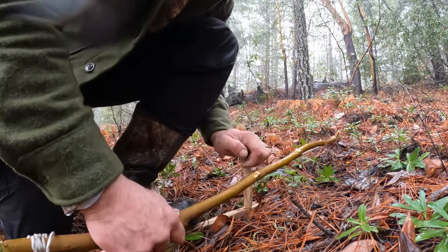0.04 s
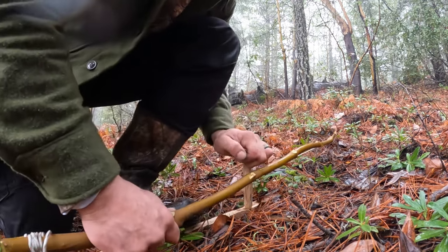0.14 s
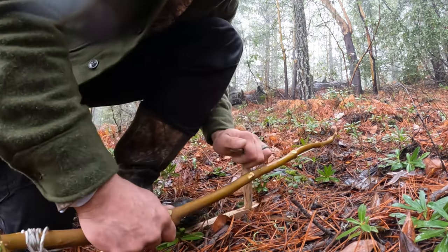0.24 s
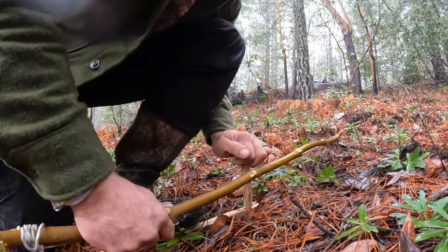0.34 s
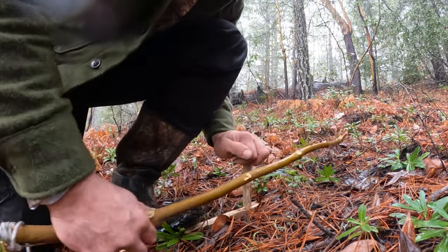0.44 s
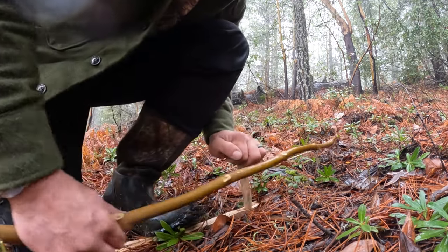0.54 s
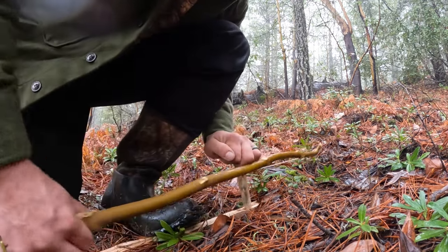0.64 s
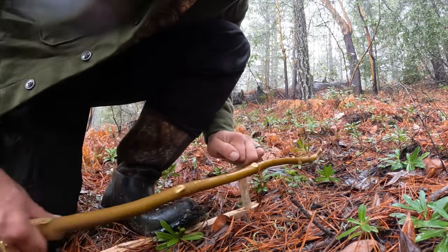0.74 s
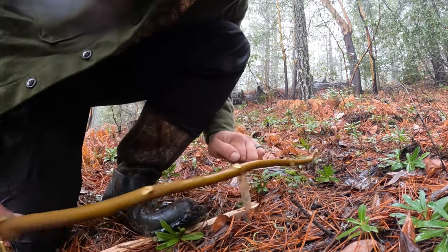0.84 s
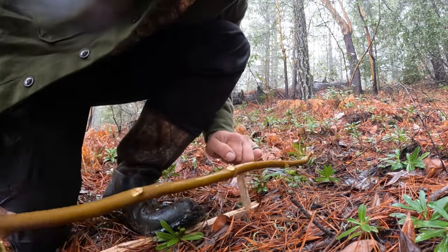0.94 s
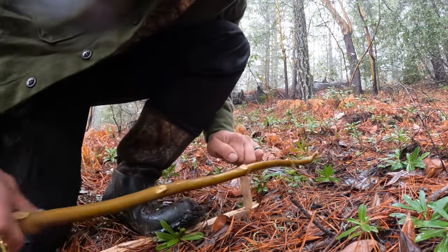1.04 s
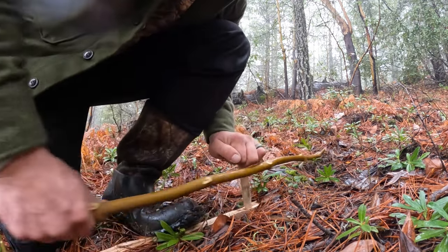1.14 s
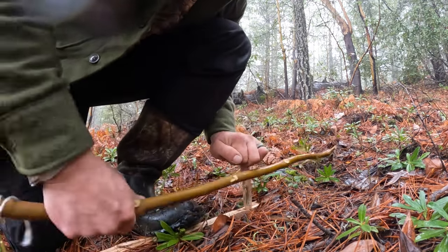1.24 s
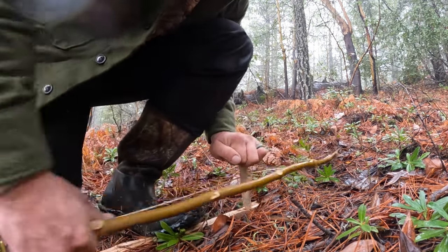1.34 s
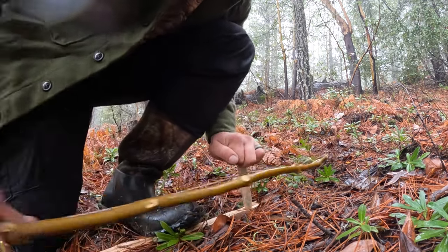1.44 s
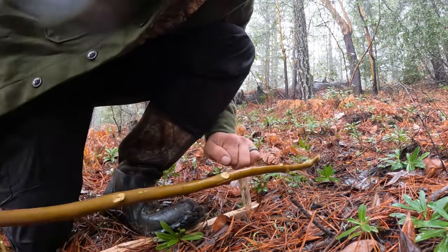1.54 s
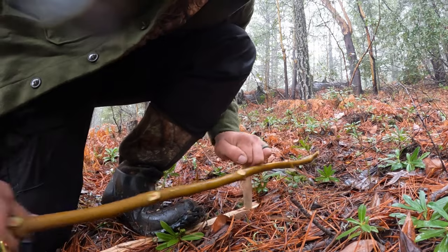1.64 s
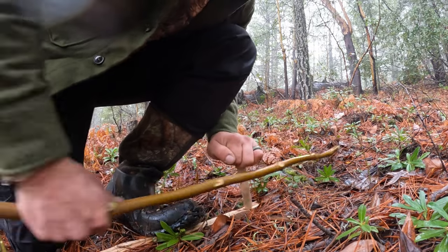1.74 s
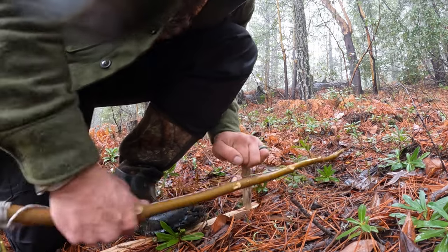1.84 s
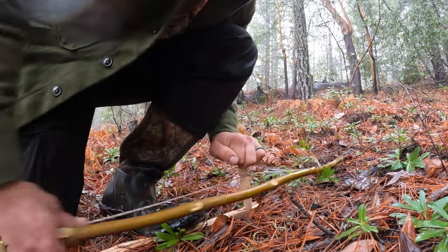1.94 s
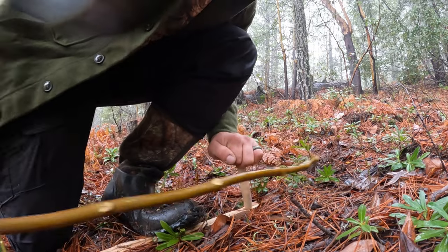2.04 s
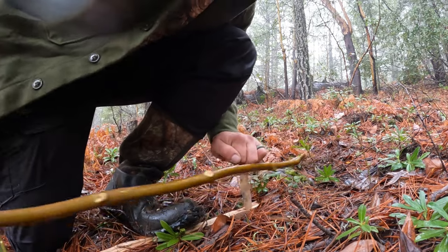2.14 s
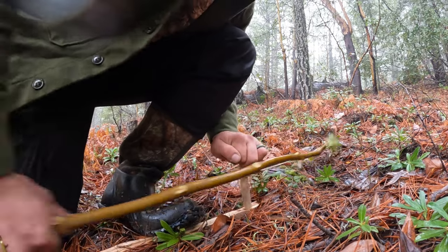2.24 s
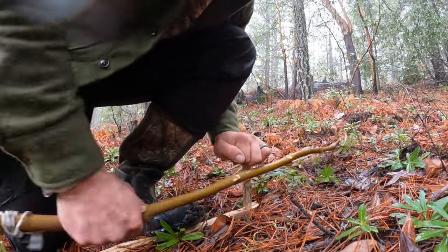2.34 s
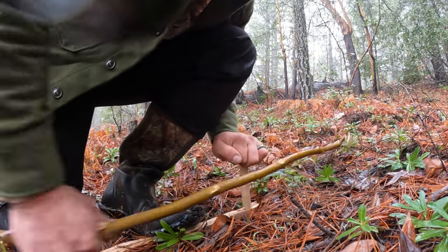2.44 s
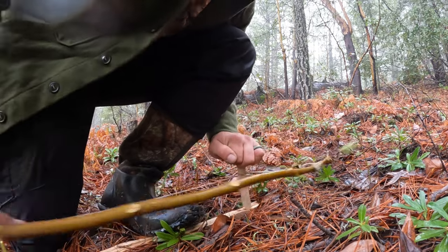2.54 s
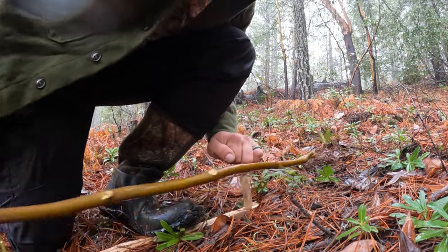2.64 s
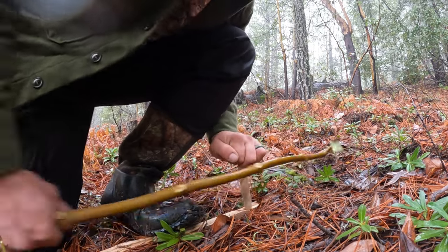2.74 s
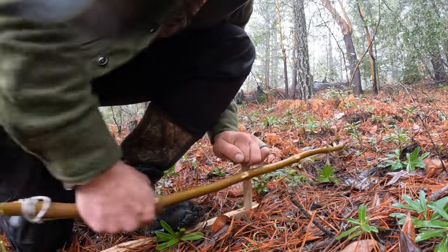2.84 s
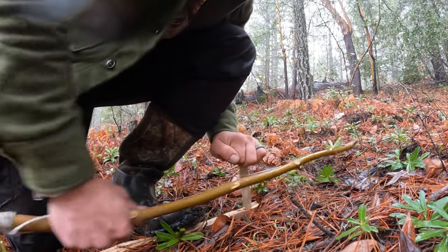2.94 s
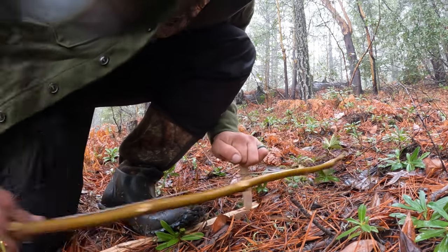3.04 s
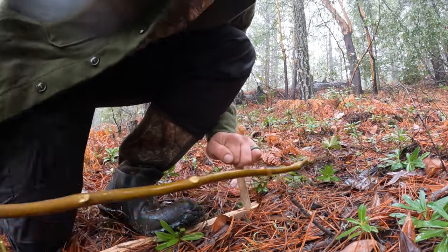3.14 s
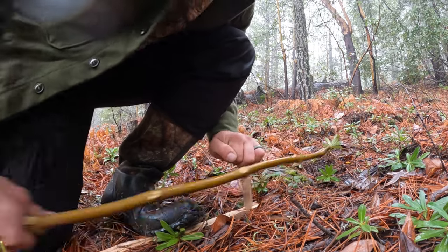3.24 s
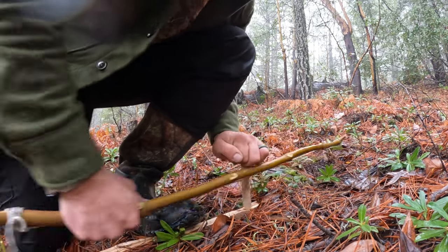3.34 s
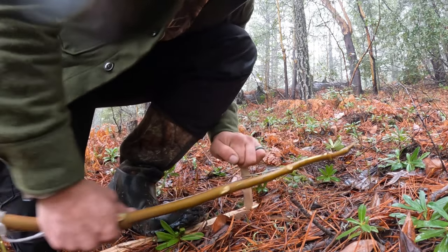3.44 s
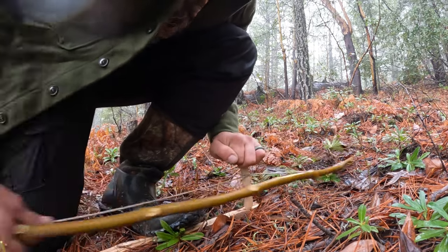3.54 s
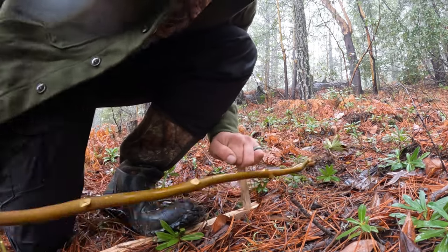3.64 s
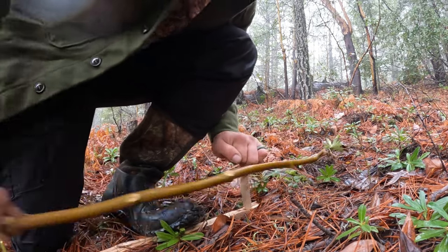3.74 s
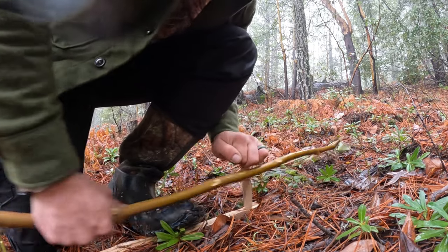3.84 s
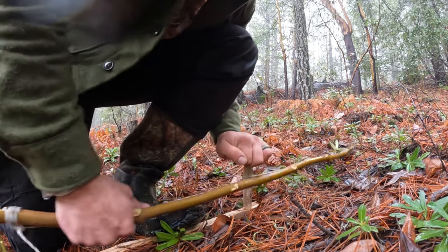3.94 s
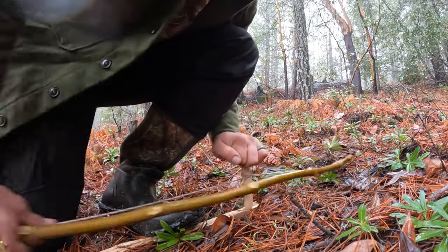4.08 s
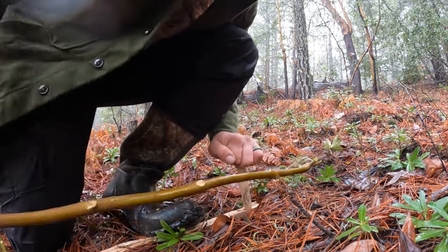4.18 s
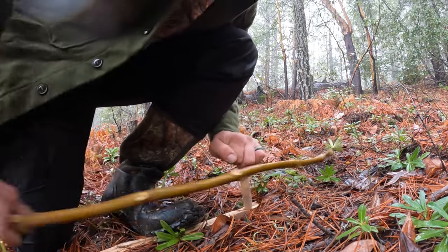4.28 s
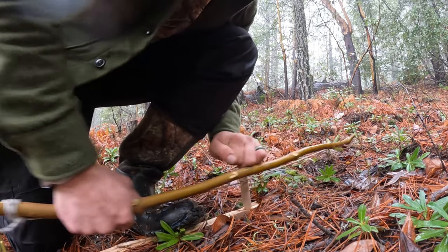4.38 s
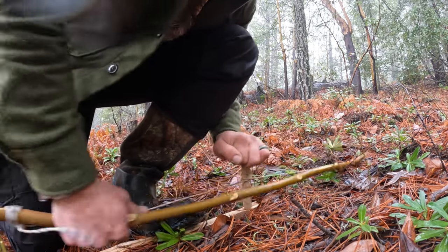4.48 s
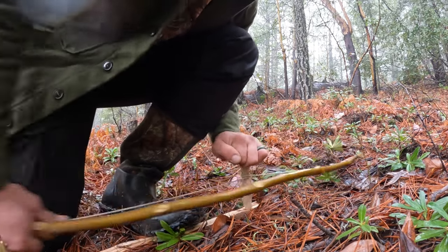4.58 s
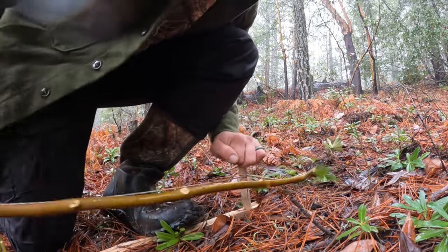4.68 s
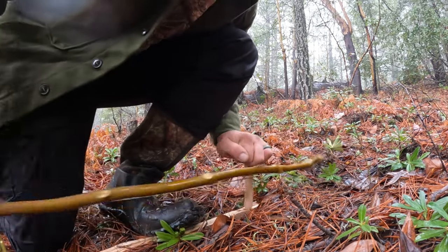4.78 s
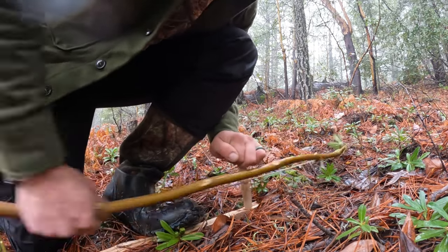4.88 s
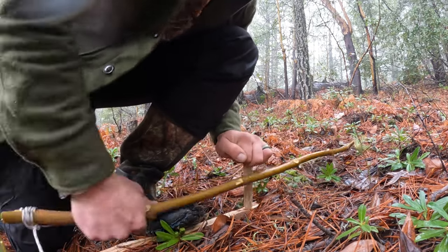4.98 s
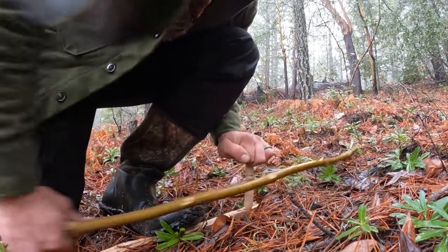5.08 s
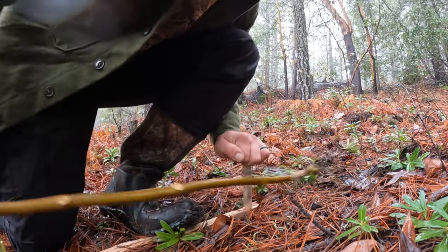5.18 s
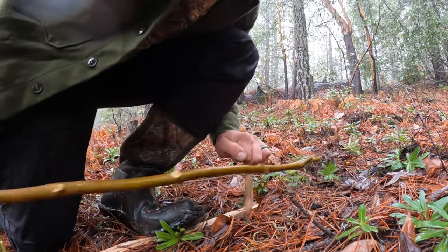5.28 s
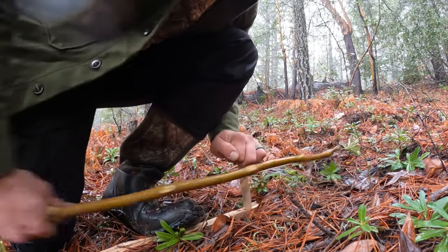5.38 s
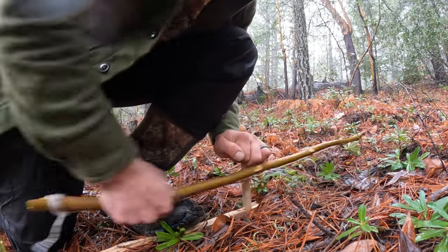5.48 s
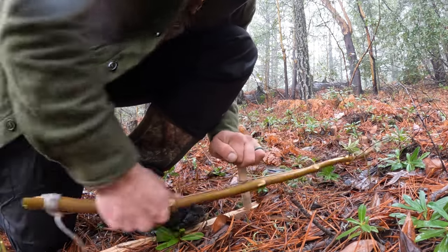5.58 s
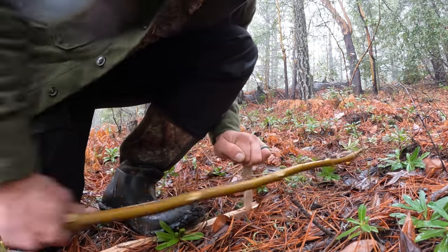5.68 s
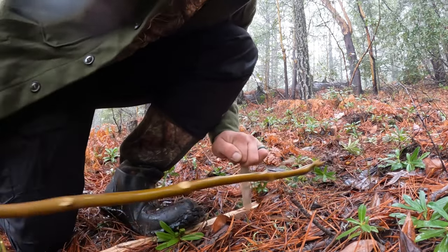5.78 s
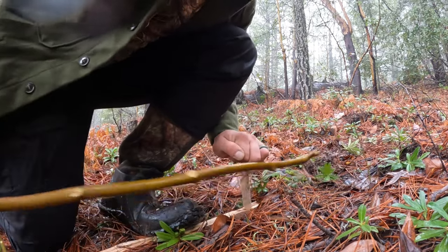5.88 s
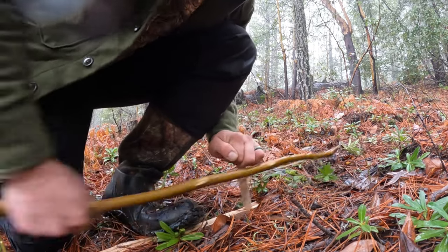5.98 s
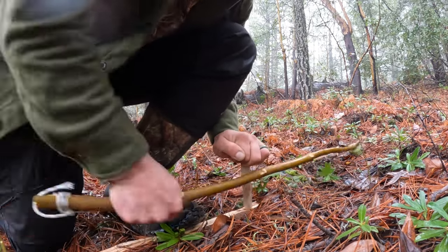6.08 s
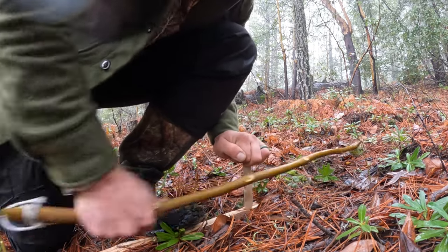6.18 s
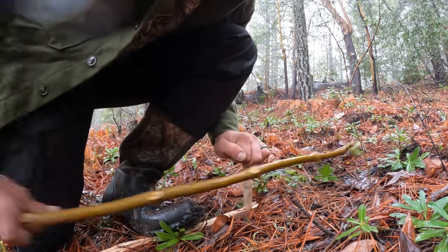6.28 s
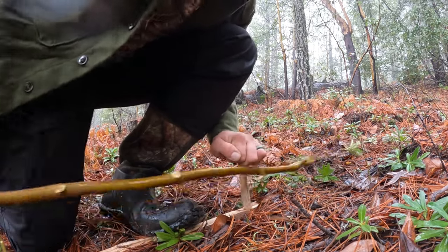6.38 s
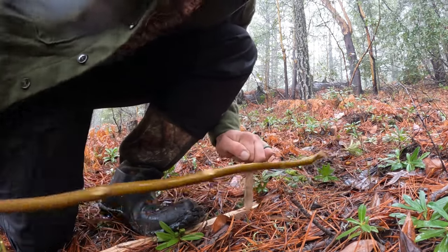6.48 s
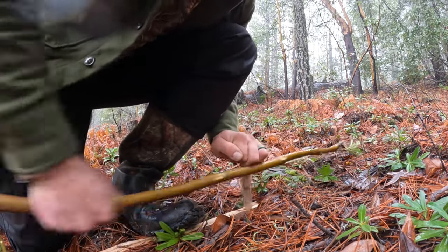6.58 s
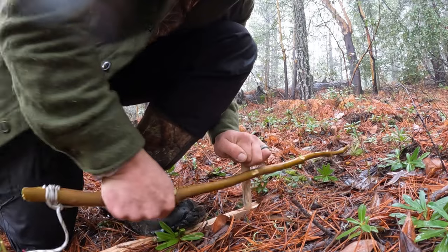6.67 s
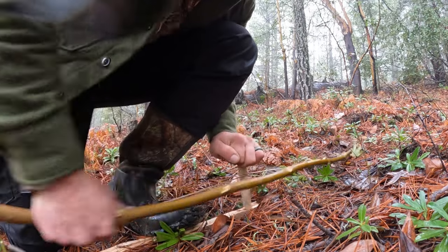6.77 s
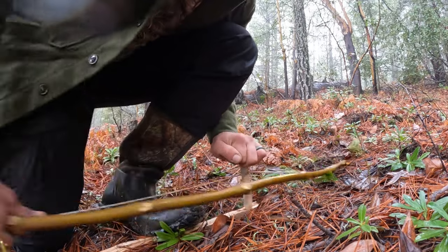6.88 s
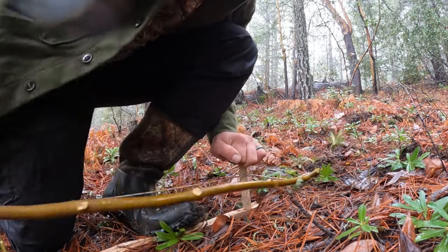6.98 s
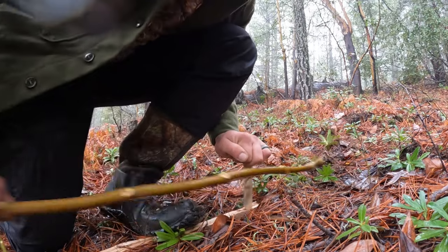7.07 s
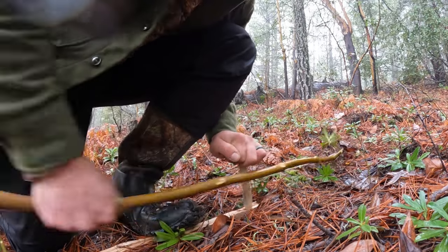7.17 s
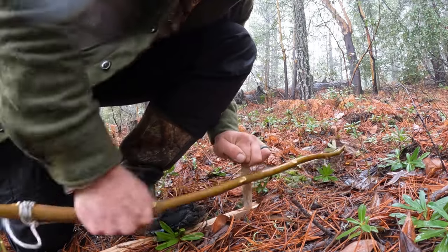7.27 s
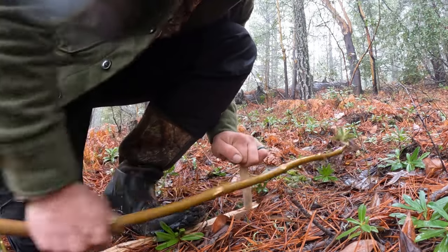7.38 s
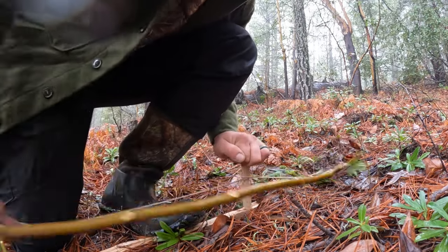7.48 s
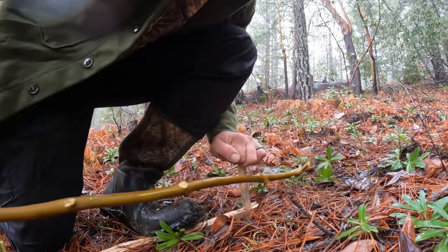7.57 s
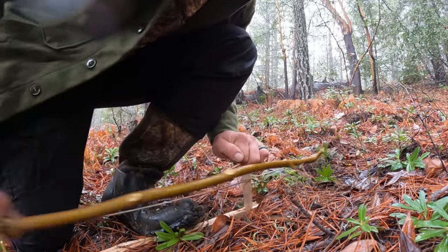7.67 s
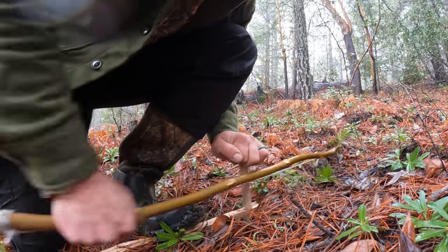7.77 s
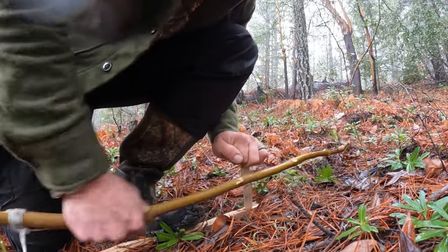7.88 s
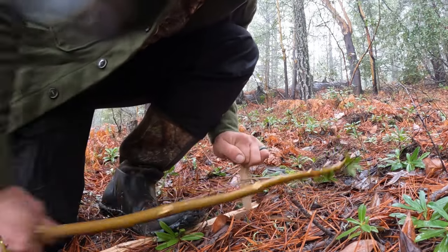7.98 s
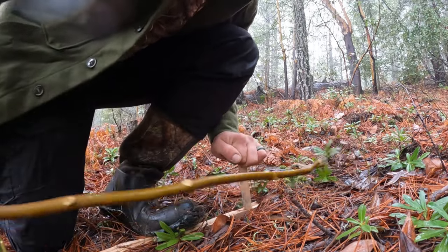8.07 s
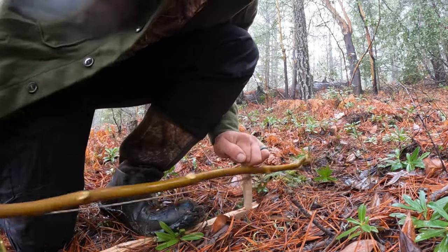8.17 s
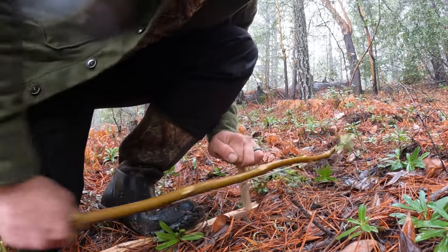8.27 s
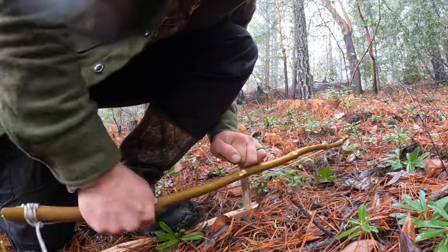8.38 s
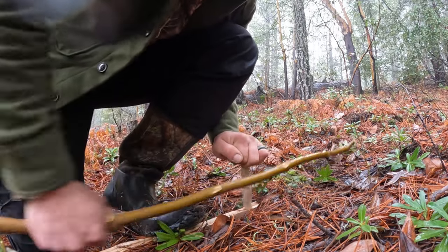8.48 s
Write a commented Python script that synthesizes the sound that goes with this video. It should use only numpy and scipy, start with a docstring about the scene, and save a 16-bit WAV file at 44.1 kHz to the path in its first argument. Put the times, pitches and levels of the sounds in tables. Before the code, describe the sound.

Very close on a quiet forest floor, a bow drill starts with a tick and a slow, throbbing scrape. After a second, quick back-and-forth rasps follow, about four strokes a second, each swelling and fading at the turn. The board chatters hollowly and the ground thrums as effort grows. Cord ticks, low knocks and a few hoarse squeaks dot the rubbing, over a faint rustle.

```python
"""On a forest floor, close to the microphone, a bow drill is worked: a slow draw, then fast strokes over it.
Tiny noisy slips make the spindle grind in the hearth board, fade at each turn and bite on the pull.
Filtered cracks and falling sines are the cord's ticks and twangs; two wavering modes are the humming stick.
Short tones squeak, the moving arm stirs low air noise, and a faint rustle lies behind it all."""
import sys
import numpy as np
from scipy import signal
from scipy.fft import rfft, irfft
from scipy.io import wavfile
from scipy.ndimage import uniform_filter1d, map_coordinates

SR = 44100
rng = np.random.default_rng(int(sys.argv[2]) if len(sys.argv) > 2 else 0)


def digitize_waveform(pressure):
    """Quantize a signal to 16-bit integers and store it at the path in sys.argv[1].

    Rows of a 2-D input are taken as channels; values are limited to [-1, 1].
    """
    field = np.atleast_2d(pressure).T
    bounded = np.clip(field, -1, 1)
    quanta = np.round(bounded * 32767).astype(np.int16)
    wavfile.write(sys.argv[1], SR, quanta)


N = 375732
T = np.arange(N) / SR
TOP_HZ = 15500  # upper limit of the fibre chirps and of the whole sound


def undb(db):
    """Decibels to gain."""
    return 10 ** (np.asarray(db) / 20)


def curve(rows):
    """Rows of (time [s], value) joined by straight lines; the end values hold."""
    return np.interp(T, *np.transpose(rows))


def over_hz(rows, hz):
    """Rows of (frequency [Hz], value) joined on a log-frequency axis."""
    points, values = np.transpose(rows)
    return np.interp(np.log(hz + 1), np.log(points), values)


def colour(x, spectrum, size=8192):
    """Causal minimum-phase filter of unit energy with the given spectrum."""
    hz = np.arange(size // 2 + 1) * SR / size
    cepstrum = irfft(np.log(undb(over_hz(spectrum, hz))))
    # folding the cepstrum forward in time makes the filter causal
    cepstrum[1:size // 2] *= 2
    cepstrum[size // 2 + 1:] = 0
    response = irfft(np.exp(rfft(cepstrum)))
    return signal.oaconvolve(x, response / np.linalg.norm(response))[:N]


def resonate(x, hz, q):
    """Let one resonance ring."""
    return signal.lfilter(*signal.iirpeak(hz, q, fs=SR), x)


def noise():
    """White noise of rms 1."""
    return rng.standard_normal(N)


def walk(rate):
    """Smooth chance of spread 1 that changes about rate times a second."""
    steps = rng.standard_normal(N // 8)
    smooth = map_coordinates(steps, [T * rate], order=3, mode="wrap")
    return smooth / smooth.std()


def add(out, start_s, sound):
    """Mix a sound into a track."""
    i = max(int(start_s * SR), 0)
    out[i:i + len(sound)] += sound[:max(N - i, 0)]


def slips(rate, spread_db):
    """Wood fibres catch and let go: dense tiny impulses of uneven size, rms 1."""
    sizes = undb(spread_db * np.minimum(rng.exponential(size=N), 6)) * rng.choice([-1, 1], N)
    impulses = sizes * (rng.random(N) < rate / SR)
    return impulses / impulses.std()


def grains(rate, half_s, spread_db, size=1024):
    """Fibres that chirp for a few milliseconds, each at its own steady pitch; rms 1."""
    count = int(rate * N / SR)
    when, pitch, phase, strength = rng.random((count, 4)).T
    gains = undb(spread_db * np.minimum(-np.log1p(-strength), 4))
    t = (np.arange(size) - size // 2) / SR
    window = np.exp(-.5 * (t / half_s) ** 2)
    out = np.zeros(N)
    for s, hz, turn, gain in zip(when * N / SR, pitch * TOP_HZ, phase, gains):
        chirp = np.sin(2 * np.pi * (hz * t + turn), dtype=np.float32)
        add(out, s, gain * window * chirp)
    return out / out.std()


def friction():
    """Dry wood on wood: mostly bare clicks, with brief chirps among them."""
    clicks = slips(rate=9000, spread_db=2.7)
    return .85 * clicks + .53 * grains(rate=2200, half_s=.003, spread_db=2.5)


# mid-stroke rub before the mix trim [dB], and its gain per dB of effort
RUB_DB, RUB_PER_EFFORT = -37.5, 0.36
# board over rub before the mix trim [dB], and its gain per dB of effort: it chatters far more under effort
BOARD_SHARE_DB, BOARD_PER_EFFORT = -6.5, 0.55
GROUND_PER_EFFORT = -0.093  # the ground follows effort less than the rub does
PULL_POINT, PUSH_POINT = 1.1, 0.76  # rub follows speed to this power: the pull peaks, the push is flatter
CORD_SLACK = .1  # share of the bow's top speed below which the cord only stretches
# strokes of the bow, pull and push in turn: (start [s], length [s], effort [dB])
BOW_STROKES = [(1.086, 0.31, -3), (1.393, 0.28, -5.5), (1.693, 0.27, -0.5), (1.967, 0.28, -2.5),
               (2.241, 0.26, 0), (2.51, 0.25, -3.0), (2.764, 0.26, 2.5), (3.022, 0.26, -1),
               (3.285, 0.24, 3.5), (3.528, 0.28, -3.5), (3.797, 0.26, 1), (4.059, 0.26, -5.5),
               (4.342, 0.221, 5.5), (4.568, 0.26, -1.5), (4.865, 0.24, 2.5), (5.119, 0.26, 0.5),
               (5.39, 0.28, 4.5), (5.672, 0.3, 1.5), (5.968, 0.279, 4), (6.258, 0.28, -2),
               (6.557, 0.27, 4.0), (6.826, 0.28, -5.5), (7.123, 0.29, 0.5), (7.409, 0.28, -3),
               (7.704, 0.24, 3), (7.964, 0.25, -4), (8.25, 0.25, 3)]
# weight on the hearth board, as ground over rub before the mix trim: (time [s], level [dB])
BOARD_WEIGHT = [(1.2, -12.5), (1.9, -5.5), (3.0, -7.5), (4.1, -6.5), (4.7, -3), (5.3, -6), (5.8, -2.5),
                (6.3, -6.5), (7.3, -6.5), (8.05, -2.5), (8.45, -7)]


def bowing():
    """The bow's motion: rub gain, board and ground shares, which strokes pull, and the spindle's speed."""
    gain, speed, effort, pull = np.zeros((4, N))
    for k, (start, length, effort_db) in enumerate(BOW_STROKES):
        now = slice(int(start * SR), int((start + length) * SR))
        pulling = k % 2 == 0
        # the spindle stands still at each end of a stroke and is fastest in the middle
        bow_speed = np.abs(np.sin(np.pi * (T[now] - start) / length))
        arc = np.maximum(bow_speed - CORD_SLACK, 0) / (1 - CORD_SLACK)
        point = PULL_POINT if pulling else PUSH_POINT
        gain[now] += undb(RUB_DB + RUB_PER_EFFORT * effort_db) * arc ** point
        speed[now] = np.maximum(speed[now], arc)
        effort[now], pull[now] = effort_db, pulling
    board_share = undb(BOARD_SHARE_DB + BOARD_PER_EFFORT * effort)
    ground_share = undb(curve(BOARD_WEIGHT) + GROUND_PER_EFFORT * effort)
    return gain, board_share, ground_share, pull, speed


# lesser bites come by chance on the pull: rate of change [Hz], strength, rarity [spreads]
BITE_HZ, BITE_STRENGTH, BITE_THRESHOLD = 55.5, 2.0, 0.86
# hardest bites of the spindle in its socket: (time [s], strength before the grip shapes it [dB])
HARD_BITES = [(1.162, 4.5), (1.232, 3), (1.299, 3.5), (3.491, 6), (3.888, 6.5), (7.232, 3.5), (7.269, 2)]


def grip(pull, speed, turns_hz=29, flutter_db=0.97):
    """Contact force: the spindle is out of round, so it presses once a turn, and now and then bites."""
    # the cord brings the spindle up to speed early in each stroke
    turns = np.cumsum(turns_hz * np.sqrt(speed) * (1 + .1 * walk(9))) / SR
    bites = sum(db * np.exp(-.5 * np.minimum(np.abs(T - s) / .008, 10) ** 2) for s, db in HARD_BITES)
    bites = bites + BITE_STRENGTH * np.maximum(walk(BITE_HZ) - BITE_THRESHOLD, 0) * pull * speed
    # the pull presses harder, so it throbs more than the push
    wobble_db = np.where(pull, 2.4, 1.5) * np.sin(2 * np.pi * turns) * speed
    # around a bite the throb weakens, and the rub is softer just before and after it
    around = uniform_filter1d(bites, int(.05 * SR))
    bite_db = 1.3 * bites - around
    return undb(wobble_db * np.exp(-np.abs(around)) + bite_db + flutter_db * walk(170))


# throb of the slow draw: rate [Hz], one moment of catching [s], full depth either way [dB]
DRAW_THROB_HZ, DRAW_CATCH_S, DRAW_THROB_DB = 6.6, 0.564, 3
# scrape of the slow draw, which runs on softly beneath the fast strokes,
# before throb and mix trim: (time [s], level [dB])
DRAW_LEVEL = [(0, -47.5), (.12, -59.5), (.33, -59.5), (.56, -47.5), (.74, -43.5), (1.0, -43), (1.04, -59.5),
              (1.2, -53)]


def slow_draw():
    """Gain of the slow draw's scrape: it throbs in slow surges and runs on softly beneath the fast strokes."""
    throb = np.cos(2 * np.pi * DRAW_THROB_HZ * (T - DRAW_CATCH_S))
    growth = np.minimum(T / DRAW_CATCH_S, 1) ** 2
    return undb(curve(DRAW_LEVEL) + DRAW_THROB_DB * throb * growth)


# softer scrape of the slow draw: (frequency [Hz], relative level per Hz [dB])
DRAW_SPECTRUM = [(90, -11), (170, 4.5), (300, -2.5), (520, -12), (900, -7), (1600, 0), (2900, -2.5),
                 (4200, 3), (5800, -6), (7400, -0.5), (10000, -14.5), (11400, -10), (15000, -33)]
# rasp of the spindle in its socket: (frequency [Hz], relative level per Hz [dB])
RUB_SPECTRUM = [(300, -19.5), (600, -10), (1400, -2.5), (2100, -3.5), (3100, 0), (4700, 0), (5900, -6),
                (6700, -3.5), (7400, 0.5), (8000, -5.5), (8800, -3.5), (10000, -17), (11400, -10),
                (12800, -16.5), (15500, -41.5)]
# ring of the hearth board, also under the knocks: (frequency [Hz], relative level per Hz [dB])
BOARD_SPECTRUM = [(200, -11), (480, -20), (620, -6), (760, 0.5), (950, -2), (1200, -11.5), (1450, -9),
                  (2000, -16), (3400, -21), (4900, -39), (6200, -25), (7300, -6), (9500, -45), (15000, -54)]
# thrum of the ground below: (frequency [Hz], relative level per Hz [dB])
GROUND_SPECTRUM = [(30, -9), (78, 1.5), (100, -2), (123, 5), (160, -2), (210, 0), (260, -6.5), (320, -4),
                   (430, -16), (600, -28), (2000, -49)]


def drill(draw_db=-3, rub_db=-3.7, board_db=-2.7, ground_db=-2.4, body_hz=1300, board_bite=1.58,
          thud_db=2.5, push_db=-2.5, thrum_db=-5.0, thrum_hz=215, thrum_q=3):
    """Slips scrape at the socket, ring the board when the spindle runs fast, and thrum in the ground."""
    gain, board_share, ground_share, pull, speed = bowing()
    force, scrape = grip(pull, speed), friction()
    draw = colour(scrape * slow_draw(), DRAW_SPECTRUM)
    rub = colour(scrape * gain * force, RUB_SPECTRUM)
    # a slow spindle only hisses: the body of the rasp comes with speed
    body = signal.lfilter(*signal.butter(1, body_hz, fs=SR), rub)
    rub = rub - (1 - speed) * body
    # the board needs both speed and pressure before it chatters
    chatter = gain * board_share * speed * force ** board_bite * undb(2.26 * walk(110))
    judder = .7 * slips(rate=4000, spread_db=2.2) + .7 * grains(rate=3000, half_s=.003, spread_db=2)
    board = colour(judder * chatter, BOARD_SPECTRUM)
    # the board rocks unevenly on the soft soil
    load = gain * ground_share * force * undb(thud_db * walk(45))
    thuds = slips(rate=450, spread_db=2.0) * load
    # the push loads it more lightly, so it thrums higher than on the pull
    thrum = resonate(thuds * (1 - pull), thrum_hz, thrum_q)
    loaded = thuds * np.where(pull, 1, undb(push_db))
    ground = colour(loaded + undb(thrum_db) * thrum, GROUND_SPECTRUM)
    return undb(draw_db) * draw + undb(rub_db) * rub + undb(board_db) * board + undb(ground_db) * ground


# hard judders that knock the hearth board: (time [s], level [dB])
BOARD_KNOCKS = [(2.875, -42), (2.921, -36.5), (3.406, -40), (3.93, -35), (5.323, -36.5), (5.553, -37.5),
                (6.099, -35.5), (6.128, -30), (6.673, -36.5), (7.817, -39), (7.851, -35.5), (8.363, -39),
                (8.399, -33.5)]


def board_knocks(half_s=0.0041, lean=0.37, size=2048):
    """A short cluster of hard slips rings the hearth board with a hollow rasp."""
    out, t = np.zeros(N), (np.arange(size) - size // 2) / SR
    # the knock rises faster than it dies
    width = half_s * (1 + .5 * lean * np.sign(t))
    window = np.exp(-.5 * (t / width) ** 2)
    ring = colour(slips(rate=2500, spread_db=2.2), BOARD_SPECTRUM)
    for s, db in BOARD_KNOCKS:
        i = int(s * SR)
        knock = ring[i:i + size] * window
        add(out, s + t[0], undb(db) * knock * np.linalg.norm(window) / np.linalg.norm(knock))
    return out


# spindle squeaks: (time [s], pitch before waver [Hz], level before roughness [dB], half length [s])
SPINDLE_SQUEAKS = [(0.43, 2400, -60, 0.077), (0.577, 2200, -46, .005), (2.625, 1560, -43, 0.013),
                   (2.895, 1496, -38.5, .005), (3.129, 1460, -35, 0.0086), (5.214, 1542, -39, 0.017)]


def squeaks(waver=0.053, rough_db=3, octave_db=-15):
    """For a moment the slips lock to one resonance of the spindle: a hoarse, short tone."""
    out, drift = np.zeros(N), 1 + waver * walk(350)
    for s, hz, db, half_s in SPINDLE_SQUEAKS:
        near = np.abs(T - s) < .1
        phase = 2 * np.pi * np.cumsum(hz * drift[near]) / SR
        tone = np.sin(phase) + undb(octave_db) * np.sin(2 * phase)
        out[near] += undb(db) * np.exp(-.5 * ((T[near] - s) / half_s) ** 2) * tone
    return out * undb(rough_db * walk(200))


# dry ticks of the cord, with faint handling ticks early on:
# (time [s], peak level [dB], band centre [Hz], decay before whitening [s])
CORD_TICKS = [(.009, -18.5, 1770, 0.0016), (.096, -39, 3500, .001), (.138, -40, 2600, .003),
              (.884, -29.5, 1000, 0.0036), (1.0745, -33.5, 4400, 0.0017), (2.569, -23, 4060, .0006),
              (3.998, -29.5, 1900, 0.00067), (4.328, -34, 3900, 0.0012), (4.887, -33.5, 2430, 0.0018),
              (5.514, -18, 4060, .002), (5.993, -34, 3480, .001), (6.1263, -7.5, 3200, 0.001),
              (6.542, -35, 2900, 0.0011), (7.152, -21, 2000, 0.0022), (8.264, -30, 2480, .002)]
# what the wood rings with under a tick: (frequency [Hz], mean level over the bare crack [dB])
WOOD_MODES = [(450, 14), (660, 6), (1750, -0.5), (3420, -4.5), (4800, -2.5)]


def ticks(spread=1.64, tail_db=-26, tail_s=0.0045, regrip_s=0.01, regrip_db=-38.5, regrip_hz=4000,
          scatter_db=2.5, mode_q=7, size=2048):
    """Dry ticks of the cord, and faint handling ticks: each a short crack with a faint wooden tail."""
    out, t = np.zeros(N), np.arange(size) / SR
    # from the fourth stroke on, the cord takes hold again with a small tick just after each turn
    regrips = [(row[0] + regrip_s, regrip_db, regrip_hz, tail_s / 4) for row in BOW_STROKES[3:]]
    rows = list(CORD_TICKS) + regrips
    for (s, db, hz, decay_s), burst in zip(rows, rng.standard_normal((len(rows), size))):
        # whitening: the crack holds all pitches alike until the wood colours it
        snap = rfft(burst * (np.exp(-t / decay_s) + undb(tail_db) * np.exp(-t / tail_s)))
        snap = irfft(snap / np.abs(snap)) * np.exp(-t / (2 * tail_s))
        band = signal.butter(1, [hz / spread, hz * spread], "band", fs=SR, output="sos")
        dull = signal.butter(3, min(hz * 2.7, 9000), fs=SR, output="sos")
        crack = signal.sosfilt(dull, signal.sosfilt(band, snap))
        # each tick lands on another spot, so the modes answer in other proportions
        wood = sum(undb(mode_db + scatter_db * rng.standard_normal()) * resonate(crack, mode_hz, mode_q)
                   for mode_hz, mode_db in WOOD_MODES)
        crack = crack + wood
        add(out, s, undb(db) * crack / np.abs(crack).max())
    return out


# cord jerks tight: (time [s], peak level before roughness [dB])
CORD_TWANGS = [(.011, -41), (.745, -46), (.885, -38), (1.615, -38), (4.818, -41), (5.318, -36.5),
               (5.621, -24.5), (6.124, -31), (7.185, -37.5)]


def twangs(first_hz=290, last_hz=145, fall_s=0.0096, rise_s=0.0024, decay_s=0.0075, size=4096):
    """A jerk runs along the bow as a rough knock; high bending waves arrive first, so the pitch drops."""
    out, t = np.zeros(N), np.arange(size) / SR
    hz = last_hz + (first_hz - last_hz) * np.exp(-t / fall_s)
    shape = (1 - np.exp(-t / rise_s)) * np.exp(-t / decay_s)
    twang = np.sin(2 * np.pi * np.cumsum(hz) / SR) * shape
    for s, db in CORD_TWANGS:
        add(out, s, undb(db) * twang / np.abs(twang).max())
    return out * (.9 + .25 * walk(400))


# low hums of the stick that swell from the middle of some strokes:
# (start [s], peak of the swell [dB], decay [s])
STICK_HUMS = [(2.38, -41.5, .11), (4.48, -39.5, .13), (4.78, -39.5, 0.095), (4.97, -40.5, 0.19),
              (5.56, -36.5, .14), (6.08, -33.5, 0.19), (6.72, -38.5, 0.28), (7.28, -40.5, 0.051),
              (7.87, -37, 0.066), (8.41, -41, .1)]


def bow_hum(hz=66.6, second_ratio=1.8, second_db=-14, rise_s=0.014, waver=0.024, size=32768):
    """The stick's two lowest bending modes swell and ring on; their pitch shifts with the grip."""
    power, t = np.zeros(N), np.arange(size) / SR
    for s, db, decay_s in STICK_HUMS:
        shape = (1 - np.exp(-t / rise_s)) ** 2 * np.exp(-t / decay_s) * (1 - t / t[-1])
        # overlapping hums add as power
        add(power, s, (undb(db) * shape / shape.max()) ** 2)
    phase = 2 * np.pi * np.cumsum(hz * (1 + waver * walk(6))) / SR
    second = undb(second_db) * walk(25) * np.sin(second_ratio * phase)
    return np.sqrt(power) * (np.sin(phase) + second)


# air stirred by the arm, before the strokes sway it: (time [s], level [dB])
ARM_LEVEL = [(0, -63), (1.3, -62), (2, -51.5), (3.4, -50), (5, -47), (6.4, -52.5), (8, -48)]


def arm_stir():
    """Gain of the stirred air: from the first fast stroke on, the sleeve pushes most air in mid-stroke."""
    speed = bowing()[-1]
    sway_db = 4.3 * (speed - 0.6) + 2 * walk(9)
    return undb(curve(ARM_LEVEL) + sway_db * (T > BOW_STROKES[0][0]))


# low rumble of stirred air: (frequency [Hz], relative level per Hz [dB])
AIR_SPECTRUM = [(10, -15.5), (26, 4), (38, -5.5), (55, 0.5), (90, -12.5), (200, -39), (1000, -73)]


def arm_air(stir):
    """Turbulent air around the moving arm: low noise that follows the stir."""
    return colour(noise(), AIR_SPECTRUM) * stir


# rustle and outdoor murmur: (frequency [Hz], relative level per Hz [dB])
FOREST_SPECTRUM = [(20, -3.5), (100, -15.5), (180, -1), (350, -21), (800, -24.5), (1400, -15.5),
                   (2100, -19.5), (4400, -19.5), (9000, -28.5), (15000, -71)]


def forest(db=-61.2):
    """Faint rustle of clothes and leaves over a low outdoor murmur: gently uneven coloured noise."""
    return undb(db) * colour(noise() * undb(0.5 * walk(9.5)), FOREST_SPECTRUM)


# lead of the left microphone port over the right: (frequency [Hz], phase [rad])
PORT_LEAD = [(400, -0.11), (1500, -0.39), (3100, -0.66), (5500, -0.32), (7000, -0.39), (9500, 0)]
# left port over the right: (frequency [Hz], level [dB])
PORT_TILT = [(70, 1.5), (500, -2), (2380, 0.3), (6000, -0.5), (15000, 3)]
# gain of the scatter from the forest floor: (frequency [Hz], level [dB])
FLOOR_SCATTER = [(50, -14), (150, -17), (800, -18), (2200, -13), (6200, -13), (8700, -17), (11500, -9),
                 (13000, -2)]


def ports(direct, scattered):
    """Two close ports hear direct sound slightly apart; scatter, opposite in the two, widens it."""
    hz = np.arange(N // 2 + 1) * SR / N
    # each port takes half of the phase and level difference
    lead = np.exp(.5j * over_hz(PORT_LEAD, hz))
    tilt = undb(over_hz(PORT_TILT, hz) / 2)
    middle = rfft(direct) * np.array([lead * tilt, lead.conj() / tilt])
    side = rfft(scattered) * undb(over_hz(FLOOR_SCATTER, hz))
    return irfft(middle + np.array([side, -side]), N)


def scene():
    """The drill, its cord and bow, and the air around them."""
    stir = arm_stir()
    # what the forest floor scatters follows the same strokes, with its own fine grain
    direct, scattered = (drill() + arm_air(stir) + forest() for _ in range(2))
    direct = direct + board_knocks() + squeaks() + ticks() + twangs() + bow_hum()
    return ports(direct, scattered)


def record(dry):
    """A steep elliptic low-pass cuts the top."""
    return signal.sosfilt(signal.ellip(8, .2, 70, TOP_HZ, fs=SR, output="sos"), dry)


dry = scene()
out = record(dry)
digitize_waveform(out)
```